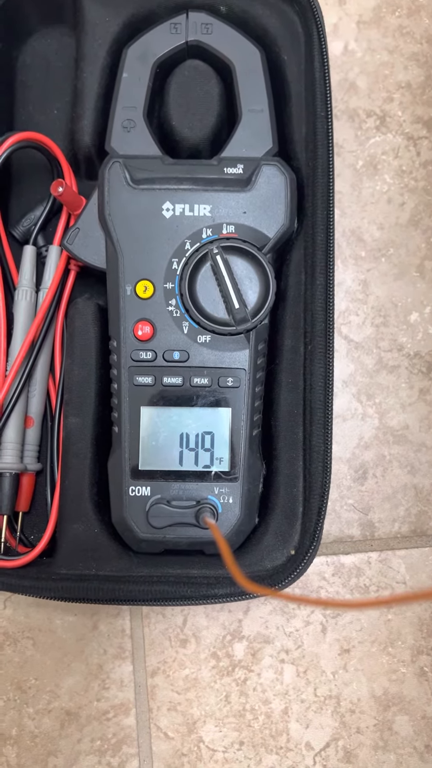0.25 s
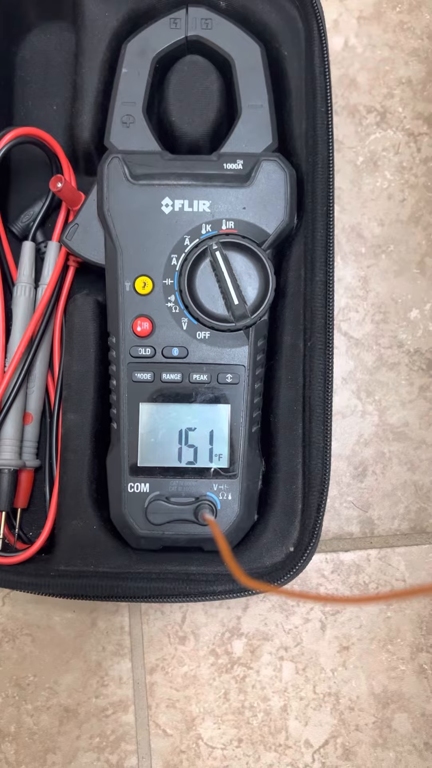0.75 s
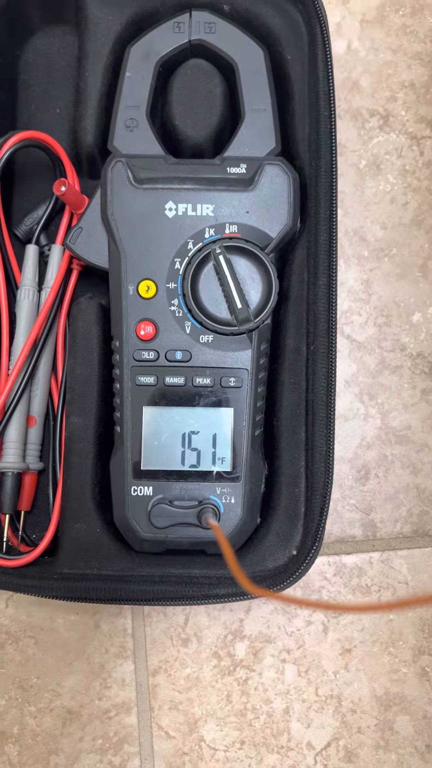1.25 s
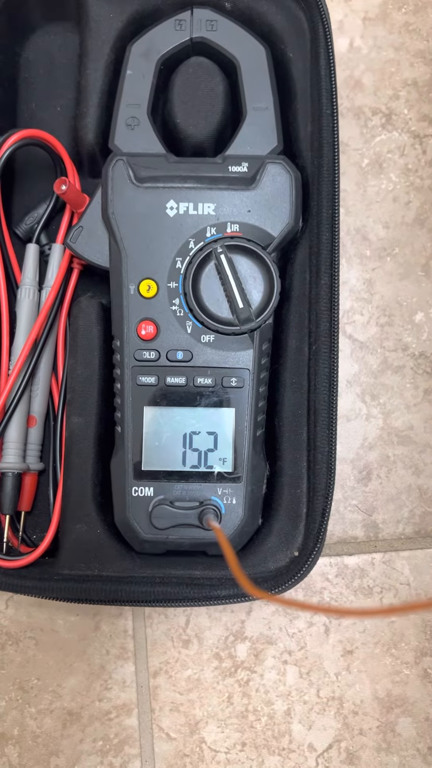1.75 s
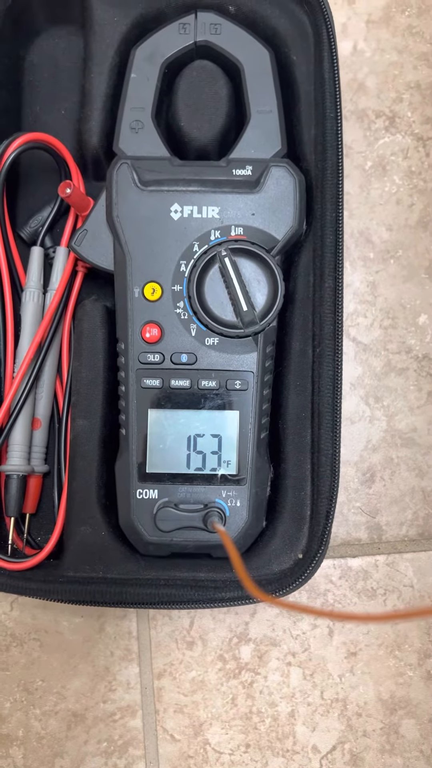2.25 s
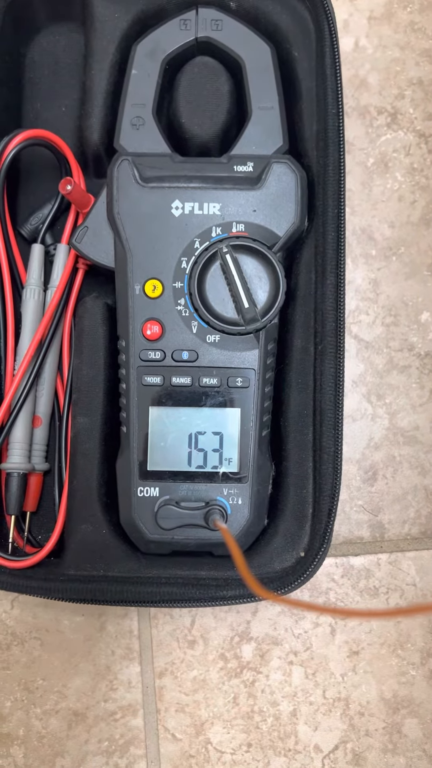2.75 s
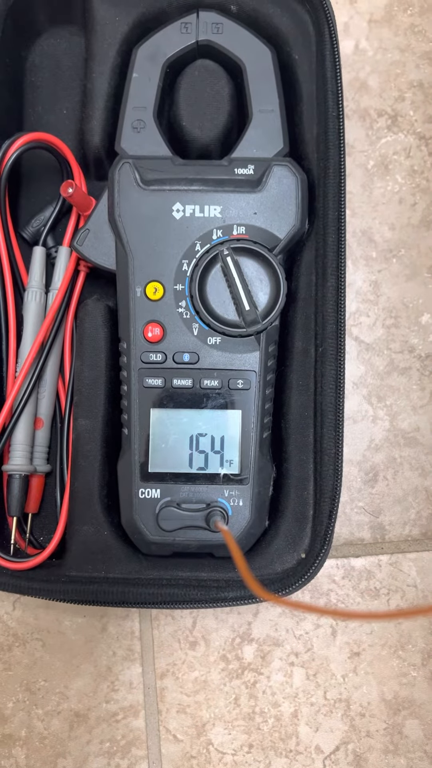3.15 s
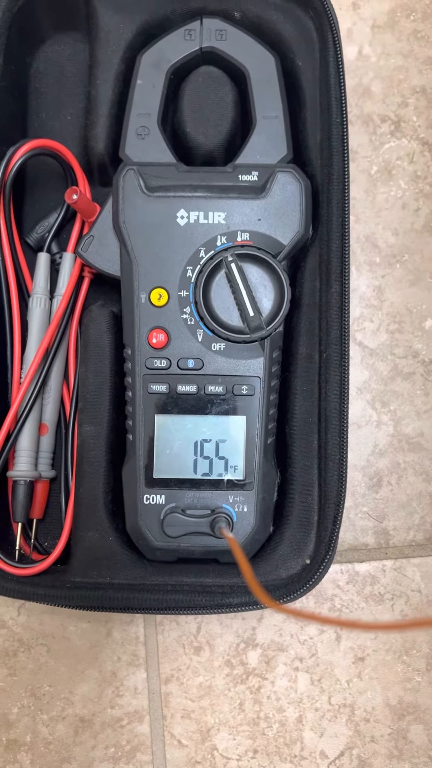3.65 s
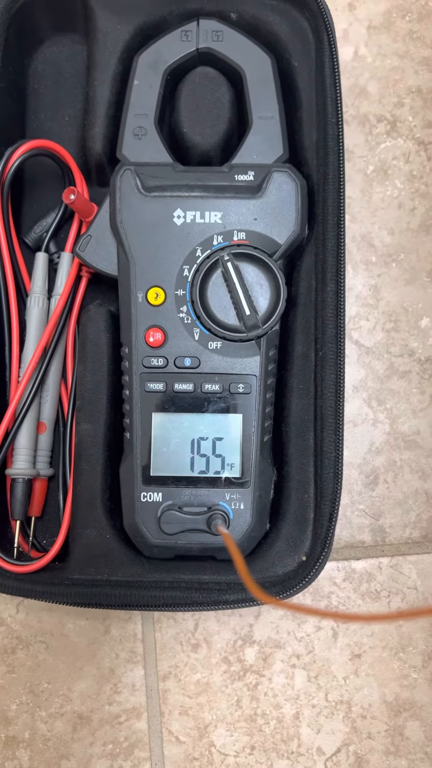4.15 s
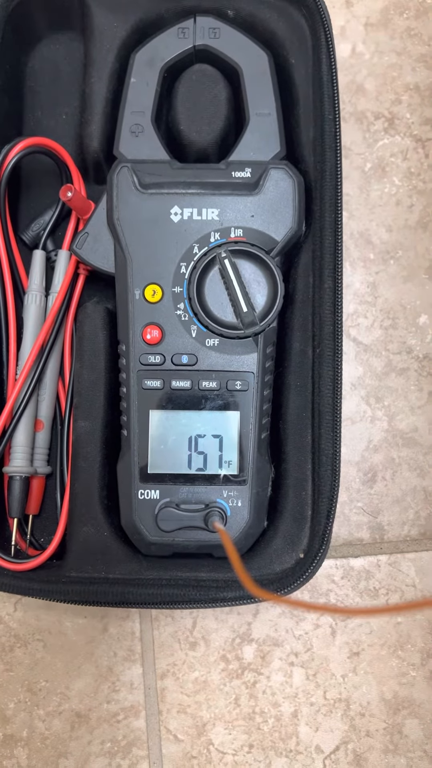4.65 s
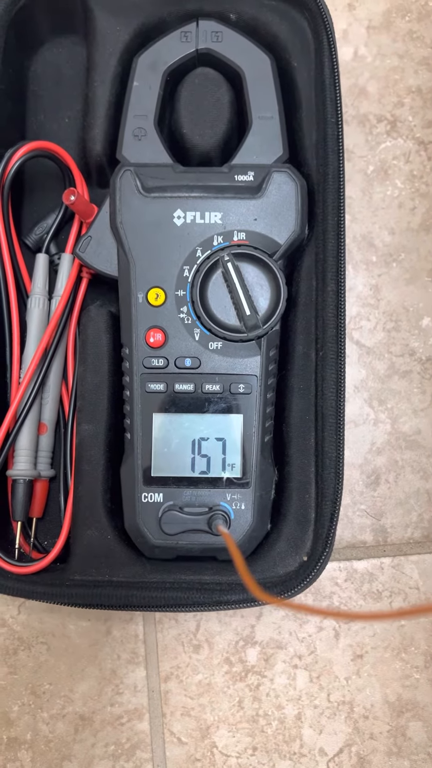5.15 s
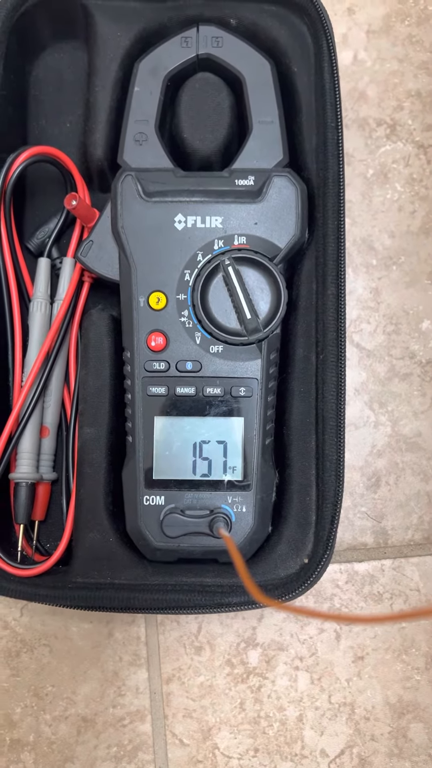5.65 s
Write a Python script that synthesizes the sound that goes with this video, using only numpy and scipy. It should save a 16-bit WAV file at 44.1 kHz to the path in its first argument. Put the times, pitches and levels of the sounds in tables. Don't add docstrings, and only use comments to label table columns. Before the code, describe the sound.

A continuous dryer drone fills the stretch from first moment to last: low mains-like hum, faint metallic panel resonance, thin blower whine and soft broadband air hiss. The load turning inside makes the hum and air pulse very slightly. One brief skip interrupts the hum near the beginning. No voices or handling, just the machine, captured in stereo by a phone in a small tiled room.

```python
import sys
import numpy as np
from scipy import signal
from scipy.fft import rfft, irfft
from scipy.io import wavfile
from scipy.ndimage import uniform_filter1d, map_coordinates

SR = 44100
rng = np.random.default_rng(int(sys.argv[2]) if len(sys.argv) > 2 else 0)


def ratio(d):
    e = np.asarray(d, float) / 20
    return 10 ** e


def int16_out(signal):
    q = np.round(np.clip(np.atleast_2d(signal).T, -1, 1) * 32767)
    wavfile.write(sys.argv[1], SR, q.astype(np.int16))


N = 260190
LOST_AT, LOST = 20727, 1024
LONG = N + LOST

HUM_HZ, SHAFT_HZ = 119.93, 29.08
DRUM_HZ = 1.183

# multiple of the hum, multiple of the shaft rate,
# left level in dB, right level in dB, lead of the left port in radians.
MOTOR_TONES = [(1, 0, -21.3, -21, -.05), (0, 1, -57, -57, 0), (1, 1, -46, -45, -.04), (1, 2, -55, -58, 0),
               (2, -1, -59, -55, -.4), (2, 0, -54, -52, -.74), (2, 1, -54, -49, -.1),
               (2, 2, -52, -50, -.47), (3, -2, -52, -50, -.34), (3, -1, -54.5, -50.5, -.16),
               (3, 0, -43, -40, .14), (3, 1, -47, -47, .53), (4, -1, -44, -48, -.26),
               (4, 0, -38, -40.5, -.98), (4, 1, -46.5, -48, -.6), (4, 2, -62, -51, .9),
               (5, -1, -62, -60, -1.1), (5, 0, -61, -50.5, -1.24), (6, 0, -66, -64, -1),
               (7, 0, -67, -61, -.6), (8, 0, -64, -59, -1.7)]
# swings in three drum turns, depth in dB.
LOAD_SWINGS = [(2, 0.2), (3, 0.28), (4, 0.4)]
# pitch in Hz, width in Hz, level in dB.
PANEL_NOTES = [(167.5, 7.2, -57.5), (208, 12, -50), (261.8, 16, -48), (293.2, 16, -46.5), (318.3, 12, -50)]
# pitch in Hz, width in Hz, level in dB.
WHINE_NOTES = [(959, 5.6, -54), (973, 8.4, -65.5), (930, 10, -74.5), (1286, 19, -61.5), (1403, 6.5, -70.5),
               (1697, 40, -68), (1510, 5, -73), (1676, 5.9, -75.5), (2211, 3.9, -67.5), (2810, 11, -71)]
# frequency in Hz, level in dB per Hz.
RUMBLE_SUM = [(20, -82), (25, -85), (48.7, -56), (85, -48), (116, -60.5), (121, -52.5), (145, -54.5),
              (185, -68), (232, -65.5), (330, -61.5), (378, -64), (404, -69), (505, -67.5), (706, -76)]
# frequency in Hz, level in dB per Hz.
AIR_SUM = [(706.0, -75.0), (964.0, -73.5), (1050.0, -80), (1290.0, -76.5), (1440.0, -82.5), (1680.0, -81.5),
           (1840.0, -83.5), (2810.0, -85.5), (3360.0, -91.0), (4480.0, -91.5), (5010.0, -97.0),
           (7000.0, -95), (10900.0, -105.0), (11700.0, -112.0)]
# frequency in Hz, level in dB per Hz.
AIR_SUM_TOP = [(12000, -124), (16000, -140)]
# frequency in Hz, level in dB per Hz.
RUMBLE_DIFFERENCE = [(20.0, -108.0), (40.8, -102.0), (52.1, -88), (65.1, -92.5), (74.4, -79.5),
                     (136.0, -77), (177.0, -83), (324.0, -70), (432.0, -74), (706.0, -73)]
# frequency in Hz, level in dB per Hz.
AIR_DIFFERENCE = [(900, -77), (1410, -81.5), (1500, -88.5), (1970, -92), (2200, -87.5), (2810, -88.5),
                  (4290, -97.5), (5120, -91.5), (6100, -106), (6900, -120), (7900, -109), (10900, -102),
                  (14300, -111), (15700, -117)]
# frequency in Hz, share from -1 to 1.
FOLLOWING_SHARE = [(60.9, -0.15), (148.0, 0.07), (207.0, -0.4), (338.0, -0.58), (462.0, 0.07),
                   (565.0, -0.38), (660.0, -0.22), (922.0, -0.5), (1720.0, -0.13), (2010.0, 0.16),
                   (5600.0, -0.08), (11400.0, 0.047)]
# frequency in Hz, share from -1 to 1.
QUARTER_SHARE = [(100, -.05), (130, -.55), (220, -0.61), (280, -0.27), (490, -.55), (1180, .15), (2200, -0.19),
                 (3000, 0), (4790, -.5), (6700, 0.056), (8500, -0.74), (10500, -0.65)]
# time in seconds, swell of the hiss in dB.
CLOTH_SWEEPS = [(.24, 2), (.72, 1.5), (1.3, 1.2), (2.03, 0.5), (2.72, 1.5), (3.03, 0.5), (3.3, 0.5),
                (3.62, 1), (4.55, 1), (5.29, 1), (5.9, 1.5)]


def unit(x):
    return x / np.sqrt(np.mean(x ** 2) + 1e-20)


def along(points, hz):
    f, v = np.transpose(points)
    return np.interp(np.log(hz + 1), np.log(f + 1), v)


def wobble(rate, count=LONG):
    knots = rng.standard_normal(int(count * rate) + 4)
    return map_coordinates(knots, [np.arange(count) * rate])


def clock():
    return np.maximum(np.arange(LONG) - LOST, 0) / SR


def sway(hz, crest_s):
    return np.cos(2 * np.pi * hz * (clock() - crest_s))


def motor():
    t = np.arange(LONG) / SR
    out = np.zeros((2, LONG))
    hum_db, third_db = load()
    for k, (hum, shaft, left_db, right_db, lead) in enumerate(MOTOR_TONES):
        tone_hz = hum * HUM_HZ + shaft * SHAFT_HZ
        if k == 0:
            phase = 2 * np.pi * tone_hz * t + 1.42
            level_db = hum_db
        else:
            flex = 0.3
            start = 2 * np.pi * rng.random()
            phase = 2 * np.pi * tone_hz * t + start + 0.14 * flex * wobble(3 / SR)
            level_db = 3 * flex * wobble(2.5 / SR)
        if (hum, shaft) == (3, 0):
            level_db = level_db + third_db
        port_phase = phase + np.array([[lead / 2], [-lead / 2]])
        ports = ratio([[left_db], [right_db]]) * np.cos(port_phase)
        out += np.sqrt(2) * ratio(level_db) * ports
    return out


def load():
    regroup_hz = DRUM_HZ / 3
    hum_db = 0.27 * sway(0.49, crest_s=1.04)
    for times, db in LOAD_SWINGS:
        hum_db = hum_db + db * sway(times * regroup_hz, crest_s=0.14)
    warming_db = 0.85 * (clock() - clock().mean())
    bending_db = 0.9 * sway(DRUM_HZ / 2, crest_s=1.67)
    return hum_db, warming_db + bending_db


def narrow_noise(table, apart):
    hz = np.fft.rfftfreq(LONG, 1 / SR)
    out = 0
    for centre_hz, width_hz, db in table:
        resonance = 1 / (1 + (2 * (hz - centre_hz) / width_hz) ** 2)
        shared, differing = rfft(rng.standard_normal((2, LONG))) * resonance
        ports = irfft([shared + apart * differing, shared - apart * differing], LONG)
        out = out + ratio(db + 1.2 * wobble(5 / SR)) * unit(ports)
    return out


def panels():
    return narrow_noise(PANEL_NOTES, apart=0.15)


def whine():
    return narrow_noise(WHINE_NOTES, apart=0.76)


def airflow():
    hz = np.fft.rfftfreq(LONG, 1 / SR)
    near = rfft(patchy_noise(depth_db=0.97))
    other = rfft(patchy_noise(depth_db=0.9))
    share = along(FOLLOWING_SHARE, hz) + 1j * along(QUARTER_SHARE, hz)
    apart = share * near + np.sqrt(np.clip(1 - abs(share) ** 2, 0, 1)) * other

    sum_db = along(RUMBLE_SUM + AIR_SUM[1:] + AIR_SUM_TOP, hz) + tile_ripple(hz)
    difference_db = along(RUMBLE_DIFFERENCE + AIR_DIFFERENCE, hz) + tile_ripple(hz)
    mid = near * ratio(sum_db)
    side = apart * ratio(difference_db)
    ports = np.array([mid + side, mid - side])

    low = 1 / (1 + (hz / 650) ** 4)
    high = 1 - 1 / (1 + (hz / 3000) ** 4)
    rumble = irfft(ports * low, LONG)
    duct = irfft(ports * (1 - low - high), LONG)
    hiss = irfft(ports * high, LONG)
    hiss_db, duct_db = flow()
    return rumble + ratio(duct_db) * duct + ratio(hiss_db + 0.25 * wobble(12 / SR)) * hiss


def patchy_noise(depth_db):
    z = signal.stft(rng.standard_normal(LONG + 1024), nperseg=512)[2]
    patches = uniform_filter1d(rng.standard_normal(z.shape), size=6, axis=0)
    patches = uniform_filter1d(patches, size=12, axis=1)
    x = signal.istft(z * ratio(depth_db * unit(patches)), nperseg=512)[1][:LONG]
    return unit(x) * np.sqrt(SR / 2)


def tile_ripple(hz):
    knots_per_bin = SR / LONG / 13
    return 1.9 * np.clip(hz / 1500, 0, 1) * wobble(knots_per_bin, count=len(hz))


def flow():
    rise_s, decay_s = 0.022, 0.069
    sweeps_db = 0.13 * sway(3 * DRUM_HZ, crest_s=0.23)
    for s, db in CLOTH_SWEEPS:
        since = clock() - s
        sweeps_db = sweeps_db + db * np.exp(-abs(since) / np.where(since < 0, rise_s, decay_s))
    sweeps_db = sweeps_db - sweeps_db.mean()
    fading_db = -0.49 * (clock() - clock().mean())
    return sweeps_db + fading_db, 0.6 * sweeps_db


def scene():
    tones = np.delete(motor(), np.s_[LOST_AT:LOST_AT + LOST], axis=1)
    noises = panels() + whine() + airflow()
    return tones + noises[:, LOST:]


def roll_off(x):
    return signal.sosfilt(signal.butter(12, 15750, fs=SR, output="sos"), x)


def record(dry):
    return roll_off(dry)


dry = scene()
out = record(dry)
int16_out(out)
```